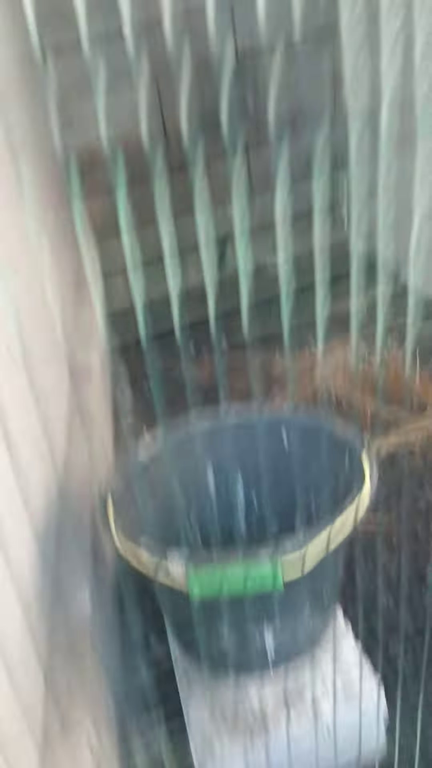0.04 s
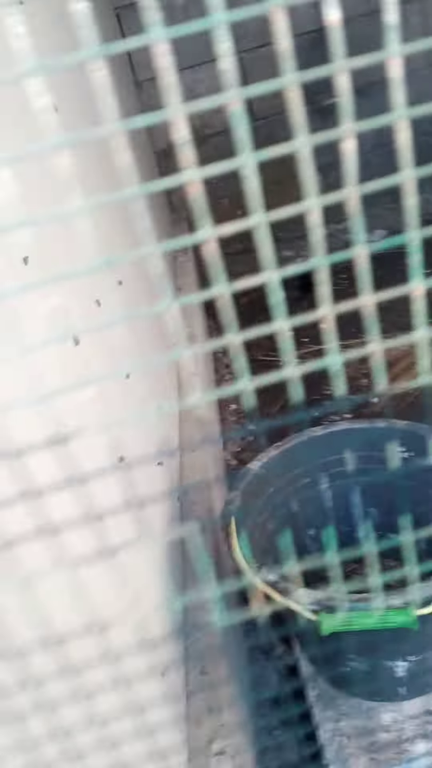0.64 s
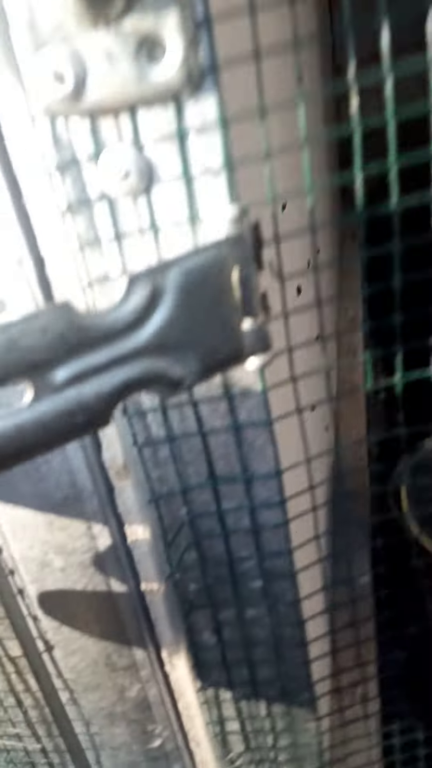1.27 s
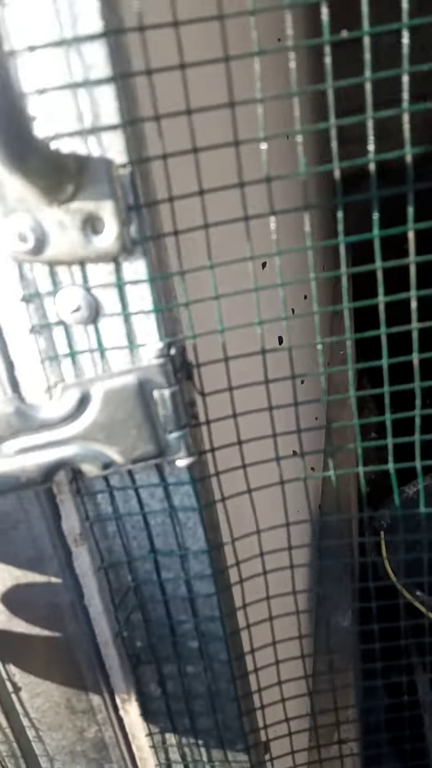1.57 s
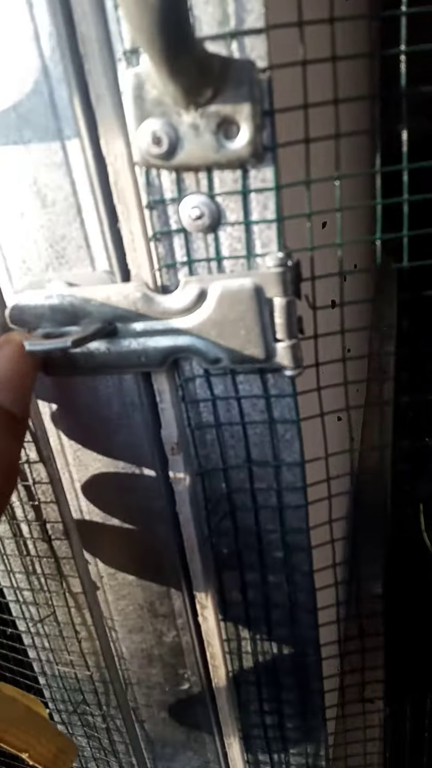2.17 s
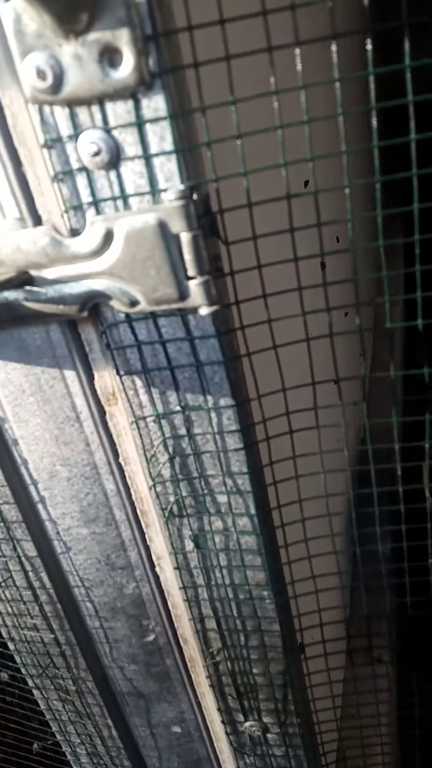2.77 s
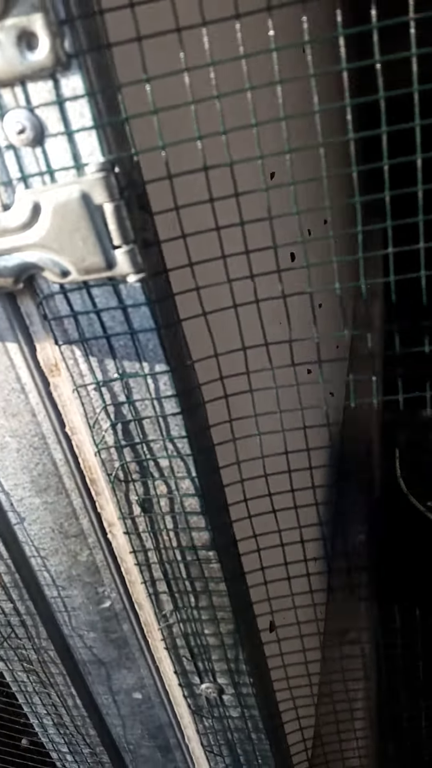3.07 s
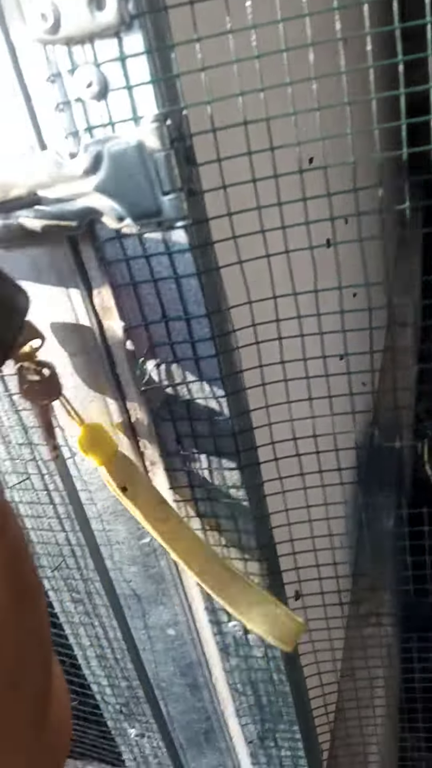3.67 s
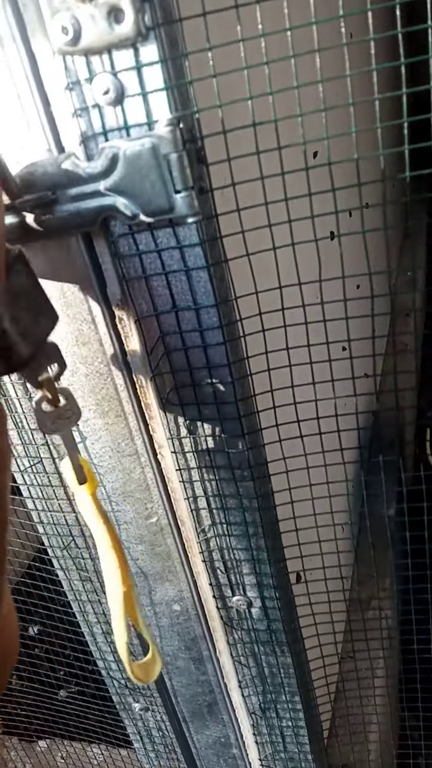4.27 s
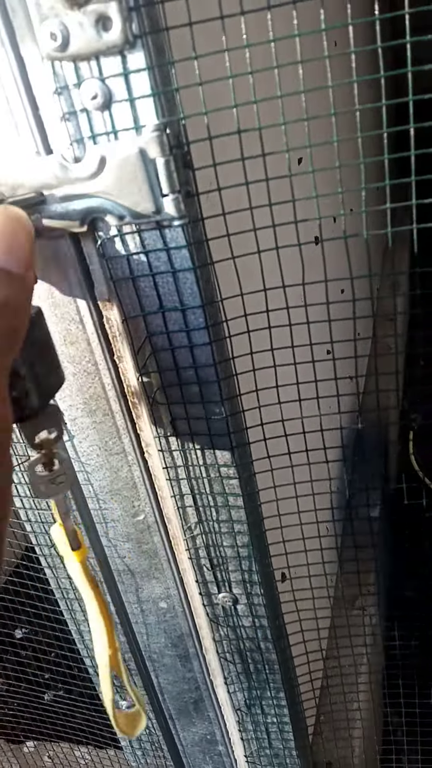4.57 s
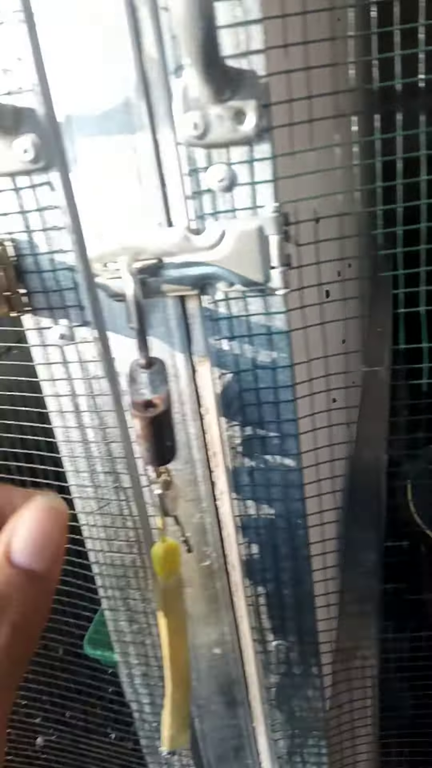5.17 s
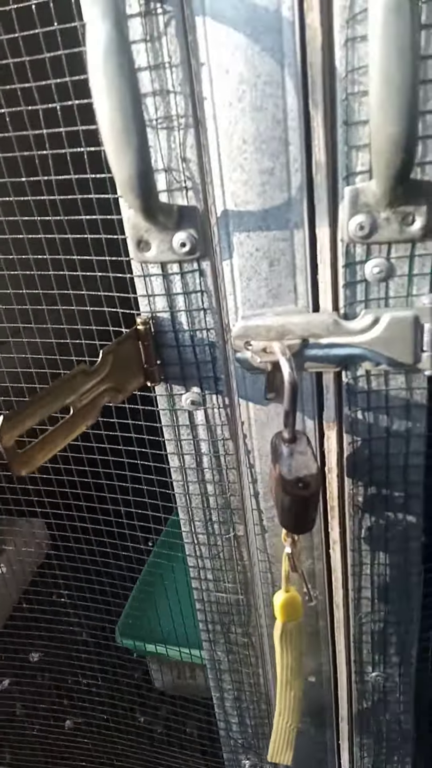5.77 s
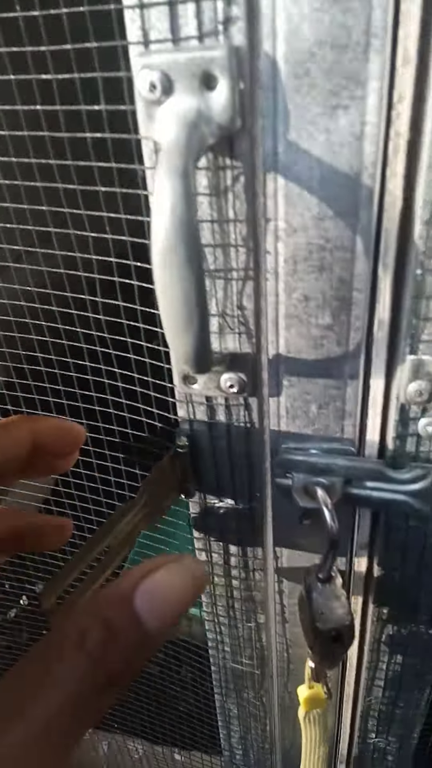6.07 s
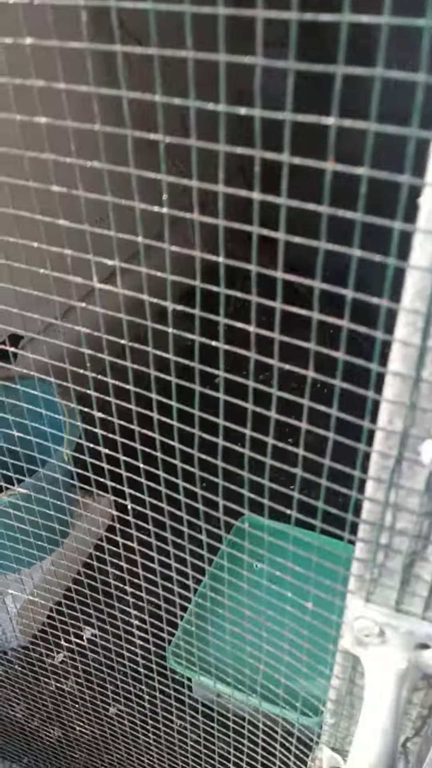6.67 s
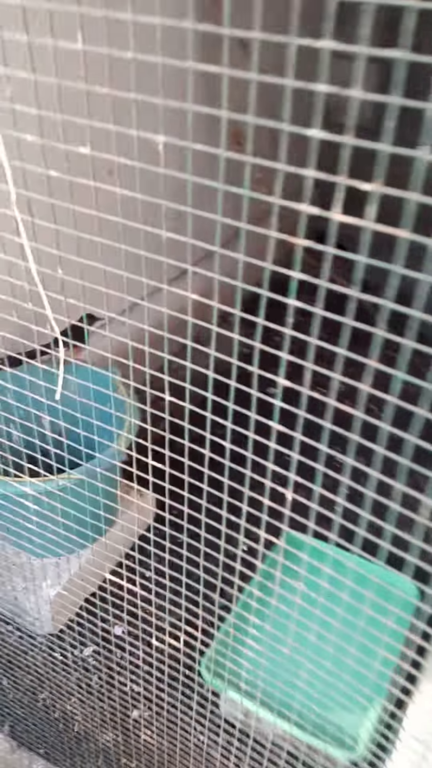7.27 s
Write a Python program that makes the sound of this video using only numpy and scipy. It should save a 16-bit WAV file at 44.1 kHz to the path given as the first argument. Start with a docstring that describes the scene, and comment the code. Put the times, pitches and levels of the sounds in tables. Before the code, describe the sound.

Close clanks from a wire-mesh metal door being latched and padlocked, with jingling keys and faint birds whistling in the background.

```python
"""Birds whistle and chirp a little way off over quiet outdoor air, echoed by the walls of a yard.
Close by, a sheet-metal door covered in wire mesh is pushed shut; its hasp rattles and a padlock is
hooked in and snapped closed, each impact exciting the damped modes of sheet, frame and hasp.
Keys tinkle under the lock in their bending modes, a second hasp ticks, and a hand brushes along
the mesh with the hiss of stick-slip friction."""
import sys
import numpy as np
from scipy import signal
from scipy.fft import rfft, irfft, next_fast_len
from scipy.io import wavfile
from scipy.ndimage import map_coordinates

SR = 44100
rng = np.random.default_rng(int(sys.argv[2]) if len(sys.argv) > 2 else 0)


def dump(signal):
    """Clip the signal to [-1, 1] and save it as 16-bit WAV at the path in sys.argv[1]."""
    limited = np.clip(np.atleast_2d(signal).T, -1, 1)
    pcm = np.round(limited * 32767).astype(np.int16)
    wavfile.write(sys.argv[1], SR, pcm)


N = 322812

# square blows on the door and its hasp: start_s, level_db, thump_db, brightness_db
DOOR_BLOWS = [(0.841, -46.5, -8.5, -7), (1.229, -48.5, -2, -12), (1.3532, -19.5, -1, -1.5),
              (1.534, -38.5, 1, -6), (1.57, -45.5, -26, -7.5), (1.969, -34.5, -7.5, -4),
              (1.986, -33, -6, 3.5), (2.029, -49, 2, 7), (3.7026, -32.5, -30, -6.5), (3.808, -35, -3.5, 8),
              (3.828, -30.5, -3, 5.5), (3.847, -36, -4.5, 5), (3.89, -38.5, -7, 2),
              (4.018, -44.5, -2.5, -5), (4.119, -38.5, -13, -8), (4.292, -51, -12, -10),
              (4.368, -34.5, -4, -1), (4.382, -42.5, -10, -9), (4.4524, -39.5, -27, -4),
              (4.501, -36.5, -29, -3), (4.5679, -19.5, -19.5, 3.5), (4.762, -31.5, -25, -4.5),
              (4.79, -51, -22, -6)]
# glancing contacts of metal on metal: start_s, level_db, thump_db, brightness_db
DOOR_SCRAPES = [(0.742, -38.5, -13, 1.5), (0.853, -47.5, -22, -1), (1.302, -35, -10, -1.5),
                (1.69, -36.5, -20, -9), (1.701, -45.5, -7, 10), (1.846, -46.5, 2.5, -5),
                (2.09, -46.5, -5.5, 5), (2.219, -48, -7.5, -4), (3.203, -29.5, -30, 6),
                (3.36, -42.5, -27, 7), (3.442, -50, -27, -10), (3.678, -40.5, -12, -8),
                (4.008, -44, -6, -2), (4.052, -49, -3, -6), (4.277, -35, -14, -13.5),
                (4.473, -38.5, -28, -12), (4.54, -36, -5.5, -3)]
# strength of the hand's brushing on the mesh: time_s, level_db
BRUSH_LEVEL = [(6.55, -64.5), (6.716, -52.5), (6.778, -63), (6.802, -50), (6.878, -57.5), (6.928, -47.5),
               (7.096, -61.5), (7.126, -43.5), (7.3, -57), (7.32, -68)]
# spectrum of the rattling door and mesh: frequency_hz, level_db
RATTLE_SPECTRUM = [(20, -77), (70, -48), (140, 3.5), (220, 2.5), (400, 0.5), (800, -0.5), (1400, 2.5),
                   (2400, -3.5), (3600, -9), (5000, -14.5), (15000, -22)]


def amp(db):
    """Decibels as an amplitude ratio."""
    return 10 ** (np.asarray(db) / 20)


def unit(x):
    """Normalisation to rms 1."""
    return x / np.sqrt(np.mean(x ** 2) + 1e-20)


def seconds(length):
    """A time axis in seconds."""
    return np.arange(int(length * SR)) / SR


def fade(t, t60):
    """Exponential decay, by 60 dB in t60 seconds."""
    return np.exp(-np.log(1000) * t / t60)


def along(points, hz):
    """Interpolation of (frequency_hz, value) points on a logarithmic frequency axis."""
    knots_hz, values = np.transpose(points)
    return np.interp(np.log(hz + 1), np.log(knots_hz + 1), values)


def curve(points):
    """Linear interpolation of (time_s, value) points at every sample."""
    return np.interp(np.arange(N) / SR, *np.transpose(points))


def add(track, start_s, sound):
    """Superposition of a sound on the track."""
    start = int(np.clip(round(start_s * SR), 0, N))
    track[start:start + len(sound)] += sound[:N - start]


def wobble(rate):
    """Smooth random modulation, with rate knots a second."""
    return map_coordinates(rng.standard_normal(int(N * rate / SR) + 4), [np.arange(N) * rate / SR])


def coloured(x, spectrum):
    """Zero-phase filtering by a (frequency_hz, level_db) curve, normalised to rms 1."""
    size = next_fast_len(len(x))
    gain = amp(along(spectrum, np.fft.rfftfreq(size, 1 / SR)))
    return unit(irfft(rfft(x, size) * gain, size)[:len(x)])


def resonant(x, spectrum):
    """Minimum-phase filtering: folding the cepstrum makes the response follow its cause."""
    size = 2 * len(x)
    cepstrum = irfft(np.log(amp(along(spectrum, np.fft.rfftfreq(size, 1 / SR)))))
    cepstrum[1:len(x)] *= 2
    cepstrum[len(x) + 1:] = 0
    return irfft(rfft(x, size) * np.exp(rfft(cepstrum)))[:len(x)]


def damped(noise, decay, stretch=1):
    """Frequency-dependent damping: each band decays with its own t60, times stretch."""
    hz, t, bands = signal.stft(noise, SR, nperseg=256)
    t60 = stretch * along(decay, hz)[:, None]
    return signal.istft(bands * amp(-60 * t / t60), SR, nperseg=256)[1][:len(noise)]


def air(level_db=-66):
    """Stationary coloured noise forms the outdoor background."""
    # ambient spectrum: frequency_hz, level_db
    spectrum = [(20, -9), (45, -22), (65, -0.5), (92, 7), (125, 2), (200, -4), (400, -13), (900, -17.5),
                (2000, -10.5), (4400, -24), (5500, -33), (6700, -9), (8000, -36), (9400, -16), (10800, -46),
                (16000, -43)]
    return amp(level_db) * coloured(rng.standard_normal(N), spectrum)


def yard(x):
    """Reverberation: diffuse reflections from the walls act as convolution with decaying noise."""
    # reverberation time of the yard: frequency_hz, t60_s
    decay = [(300, 1), (2000, 0.23), (5000, 0.68), (12000, 0.11)]
    tail = damped(rng.standard_normal(SR // 2), decay)
    return signal.fftconvolve(x, tail / np.linalg.norm(tail))[:N]


def bird_tone(hz, overtone_db=-31, taper=0.4):
    """A nearly pure tone with a weak second harmonic; its phase is the integral of frequency."""
    phase = 2 * np.pi * np.cumsum(hz) / SR
    return signal.windows.tukey(len(hz), taper) * (np.sin(phase) + amp(overtone_db) * np.sin(2 * phase))


def far_whistles(bend=1.6, flutter_db=3, waver=0.0313, wall_delay_s=0.048, wall_db=-7):
    """Frequency glides that level off; reflection from a wall repeats each a moment later."""
    # slurred whistles and low, distant calls: start_s, length_s, start_hz, end_hz, level_db
    calls = [(0, 0.096, 2490, 2226, -65), (0.108, 0.1, 1610, 1864, -64.5), (0.154, 0.15, 2185, 2430, -65),
             (0.379, 0.043, 2415, 2545, -58.5), (0.384, 0.071, 2066, 1964, -62.5),
             (0.478, 0.17, 1500, 2427, -62), (0.768, 0.12, 1210, 1800, -56),
             (0.866, 0.22, 1460, 2557, -63.5), (1.638, 0.064, 619, 648, -57.5),
             (1.74, 0.15, 1605, 1570, -54), (2.413, 0.12, 1260, 1582, -53.5),
             (2.616, 0.1015, 1740, 1956, -50.5), (2.69, 0.11, 1960, 1708, -53),
             (2.721, 0.545, 763, 770, -69), (3.004, 0.13, 1190, 1890, -53.5), (3.077, .21, 1930, 2533, -54),
             (3.415, 0.11, 1390, 2360, -54), (3.697, 0.13, 1300, 2140, -56), (6.377, 0.19, 1522, 1860, -55),
             (6.716, 0.087, 1398, 1235, -52.5), (6.895, 0.09, 2070, 1830, -49.5)]
    out, drift = np.zeros(N), 1 + waver * wobble(170)
    for start_s, length_s, start_hz, end_hz, db in calls:
        progress = seconds(length_s) / length_s
        hz = end_hz + (start_hz - end_hz) * (1 - progress) ** bend
        hz *= drift[int(start_s * SR):][:len(hz)]
        add(out, start_s, amp(db) * bird_tone(hz))
    out *= amp(flutter_db * wobble(60))
    return out + amp(wall_db) * np.pad(out, (int(wall_delay_s * SR), 0))[:N]


def chirps(rasp=0.04, warble=0.0506, flutter_db=3):
    """Rapid frequency modulation spreads each arched chirp into raspy sidebands."""
    # bird chirps: start_s, length_s, reference_hz, level_db
    calls = [(0.136, 0.09, 4420, -64), (0.256, 0.085, 3280, -68), (5.646, 0.025, 3410, -59),
             (5.753, 0.16, 3904, -44.5), (6.015, 0.05, 3410, -50.5), (6.128, 0.17, 3890, -47)]
    # pitch contour of every chirp: share_of_length, share_of_reference_pitch
    arch = [(0, 0.9), (0.18, 0.86), (0.33, 0.95), (0.7, 0.94), (1, 0.7)]
    out, shake = np.zeros(N), 1 + rasp * wobble(450) + warble * wobble(110)
    for start_s, length_s, reference_hz, db in calls:
        progress = seconds(length_s) / length_s
        hz = reference_hz * np.interp(progress, *np.transpose(arch))
        hz *= shake[int(start_s * SR):][:len(hz)]
        add(out, start_s, amp(db) * bird_tone(hz))
    return out * amp(flutter_db * wobble(80))


def held_whistle(start_s=1.602, length_s=0.34, pitch_hz=1895, sink_hz_per_s=270,
                 level_db=-49.5, swell_db=9, waver=0.013, flutter_db=2):
    """Slow amplitude and frequency modulation: a nearer bird's long note swells and sinks."""
    out, t = np.zeros(N), seconds(length_s)
    hz = (pitch_hz - sink_hz_per_s * t) * (1 + waver * wobble(150)[:len(t)])
    db = level_db + swell_db * np.sin(np.pi * t / length_s) ** 2 + flutter_db * wobble(69.2)[:len(t)]
    add(out, start_s, amp(db) * bird_tone(hz, overtone_db=-23, taper=0.1))
    return out


def friction(spectrum, slips_per_s, spread_db, hiss):
    """Stick-slip friction: random impulses of uneven size over a smooth hiss."""
    slips = (rng.random(N) < slips_per_s / SR) * rng.standard_normal(N)
    slips *= amp(spread_db * np.clip(rng.standard_normal(N), -2, 2))
    return coloured(unit(slips) + hiss * rng.standard_normal(N), spectrum)


def mesh_shiver(strain_db=1, shudder_db=-43.5, db_per_contact_db=0.22, rise_s=0.023, t60_s=0.52):
    """Incoherent vibrations add in power: a tremble under the hand and a shudder after each contact."""
    # trembling of the mesh while the door is held: time_s, level_db
    strain = [(0.0, -78), (1.28, -66), (1.41, -68.5), (1.94, -54.5), (2.44, -70), (3.75, -62.5),
              (3.85, -51), (4.32, -68), (4.49, -52), (4.65, -58.5), (4.87, -67.5), (5.28, -73), (6.01, -67),
              (6.63, -70.5), (6.85, -64.5), (7.32, -69)]
    power, t = amp(curve(strain) + strain_db) ** 2, seconds(1)
    shudder = (1 - np.exp(-t / rise_s)) * fade(t, t60_s)
    for start_s, db, *_ in list(DOOR_BLOWS) + list(DOOR_SCRAPES):
        add(power, start_s, (amp(shudder_db + db_per_contact_db * db) * shudder) ** 2)
    envelope = np.sqrt(power) * amp(2 * wobble(30))
    return envelope * friction(RATTLE_SPECTRUM, slips_per_s=900, spread_db=3, hiss=0.99)


def skin_rub(grip_db=-76, taper=0.86, stick_db=3):
    """Sliding friction of skin on metal swells with each stroke above a faint resting grip."""
    # strokes of the hand: start_s, length_s, level_db
    strokes = [(2.058, 0.69, -61), (2.565, 0.59, -60), (3.6, 0.42, -54), (4.4, 0.56, -87),
               (5.045, 0.35, -66.5), (5.52, 0.62, -62.5), (5.988, 0.63, -64)]
    # spectrum of skin on metal: frequency_hz, level_db
    spectrum = [(30, -39), (300, -2), (1500, 6), (3500, 6.5), (5200, -2), (7600, 8.5), (10000, -3.5),
                (12500, -3.5), (15200, -0.5)]
    envelope = np.full(N, amp(grip_db))
    for start_s, length_s, db in strokes:
        add(envelope, start_s, amp(db) * signal.windows.tukey(int(length_s * SR), taper))
    envelope *= amp(stick_db * wobble(16))
    return envelope * friction(spectrum, slips_per_s=1500, spread_db=-1, hiss=1.4)


def mesh_brush(gain_db=1, flutter_db=2, edge_s=0.01):
    """Friction of a passing hand excites the resonances of the wires."""
    # spectrum of the brushed wires: frequency_hz, level_db
    spectrum = [(180, -16), (300, -12), (565, -13), (978, -4), (1660, -1.5), (1930, -1), (2210, -5),
                (3460, -4), (5430, -10.5), (7950, -2.5), (10700, -22.5), (14500, -14), (16000, -16)]
    t = np.arange(N) / SR
    gate = np.clip(np.minimum(t - BRUSH_LEVEL[0][0], BRUSH_LEVEL[-1][0] - t) / edge_s, 0, 1)
    envelope = gate * amp(curve(BRUSH_LEVEL) + gain_db + flutter_db * wobble(60))
    return envelope * friction(spectrum, slips_per_s=500, spread_db=7, hiss=1)


def wire_snaps(snaps_per_s=20, boost_db=12, treble_db=8):
    """Plucking: rows for ticks() of wires that flick free at random, louder under harder brushing."""
    brush_s, brush_db = np.transpose(BRUSH_LEVEL)
    count = int(snaps_per_s * (brush_s[-1] - brush_s[0]))
    starts = rng.uniform(brush_s[0], brush_s[-1], count)
    return [(start_s, np.interp(start_s, brush_s, brush_db) + boost_db, treble_db) for start_s in starts]


def ticks(gain_db=-6, t60_s=0.014, tail_db=-24, tail_t60_s=0.46):
    """Brief impacts of small parts give broadband clicks with hardly any ring."""
    # dry ticks of metal parts and wires: start_s, level_db, treble_db
    contacts = [(3.0035, -40, -8), (3.0061, -33.5, -14), (3.0778, -22.5, 9), (3.0838, -31, -7),
                (3.156, -41, -5), (3.264, -30, 14), (4.0191, -33.5, -13), (4.2942, -28.5, 35),
                (4.3794, -26.5, 0.0), (4.4521, -28, -14), (4.9614, -38, -7), (5.2979, -46.5, -41),
                (5.7518, -30.5, -11), (5.9375, -34, -21), (6.0861, -35, -17), (6.2984, -35, -5),
                (6.32, -35, -8), (6.4153, -33, 1), (6.4229, -31, 1), (6.4333, -37, -8), (6.5247, -42, -6),
                (6.7075, -34.5, -16), (6.959, -29.5, -8), (6.992, -30, -9), (7.1273, -28.5, 19),
                (7.1667, -29, 12)]
    # spectrum of a tick: frequency_hz, level_db
    spectrum = [(100, -58), (500, -6), (1300, -8), (3500, 8.5), (5000, 0), (7600, 14), (9800, -3),
                (15000, -3)]
    out, t = np.zeros(N), seconds(0.16)
    envelope = fade(t, t60_s) + amp(tail_db) * fade(t, tail_t60_s)
    for start_s, db, treble_db in list(contacts) + wire_snaps():
        tilt = [(2000, -treble_db), (9000, 0)]
        colour = [(hz, band_db + along(tilt, hz)) for hz, band_db in spectrum]
        click = resonant(rng.standard_normal(len(t)) * envelope, colour)
        add(out, start_s, amp(db + gain_db) * click / np.std(click[:SR // 1000]))
    return out


def finger_taps(width_s=0.0011, ring_db=-24, ring_t60_s=0.31):
    """Heavy damping limits a knock to a few cycles; the door rings faintly in answer."""
    # dull taps on the loose hasp: start_s, level_db, pitch_hz
    taps = [(5.7490, -27, 1510), (6.088, -29, 1360), (6.796, -37, 1700)]
    out, t = np.zeros(N), seconds(0.2)
    for start_s, db, hz in taps:
        knock = np.exp(-(t / width_s - 1) ** 2) * np.sin(2 * np.pi * hz * t)
        rattle = coloured(rng.standard_normal(len(t)), RATTLE_SPECTRUM)
        add(out, start_s, amp(db) * (knock + amp(ring_db) * fade(t, ring_t60_s) * rattle))
    return out


def key_slide(start_s=2.955, length_s=0.033, from_hz=7600, to_hz=8300, scatter=0.055, level_db=-40):
    """Random frequency modulation roughens the rising zing of a key scraping round its ring."""
    out, progress = np.zeros(N), seconds(length_s) / length_s
    hz = (from_hz + (to_hz - from_hz) * progress) * (1 + scatter * wobble(1490)[:len(progress)])
    zing = np.sin(2 * np.pi * np.cumsum(hz) / SR)
    add(out, start_s, amp(level_db) * signal.windows.tukey(len(zing)) * zing)
    return out


def keys(low_hz=7600, high_hz=11480, twin_hz=7660, twin_db=-12, linger_db=-27, rise_s=0.000057):
    """A key rings in two bending modes, the lower a beating pair; a fast decay leaves a faint tail."""
    # a key swinging against the lock: start_s, level_db, upper_mode_db, t60_s
    clinks = [(2.819, -33, -29, 0.023), (2.841, -43.5, -23, 0.073), (2.914, -29, -8.5, 0.1),
              (2.949, -31.5, -13, 0.044), (3.005, -32, -11, 0.036), (3.041, -36.5, -26, 0.15),
              (3.078, -29.5, -2, 0.083), (3.168, -52, -29, 0.33), (3.263, -47, -8, 0.17),
              (3.319, -41.5, -10, 0.015), (4.087, -35.5, -30, 0.19), (4.305, -48, -20, 0.5),
              (4.819, -32.5, -18, .12), (4.962, -40.5, -21, 0.16)]
    out, t = np.zeros(N), seconds(0.6)
    for start_s, db, upper_db, t60 in clinks:
        modes = np.sin(2 * np.pi * low_hz * t) + amp(upper_db) * np.sin(2 * np.pi * high_hz * t)
        twin = amp(twin_db) * fade(t, t60) * np.sin(2 * np.pi * (twin_hz * t + rng.random()))
        envelope = fade(t, t60) + amp(linger_db) * fade(t, t60=0.6)
        add(out, start_s, amp(db) * (modes * envelope + twin) * (1 - np.exp(-t / rise_s)))
    return out


def ring(modes, t, spread_db=4.76, detune=0.0037):
    """Modal superposition: damped sines whose strength and pitch vary as the parts shift."""
    out = np.zeros(len(t))
    for hz, db, t60 in modes:
        envelope = amp(db + rng.normal(0, spread_db)) * fade(t, t60)
        shifted_hz = hz * (1 + detune * rng.normal())
        out += envelope * np.sin(2 * np.pi * (shifted_hz * t + rng.random()))
    return out


def strike(db, thump_db, bright_db, rise_s, ring_scale=0.83, gain_db=-3):
    """Impact excitation: one contact rings the hasp, the frame and the dense modes of the sheet."""
    # crowded modes of the sheet and mesh: frequency_hz, level_db
    sheet_spectrum = [(40, -50), (150, -62), (230, -9), (370, -11.5), (750, 1), (960, -5), (1450, 4.5),
                      (2100, -5.5), (3500, -2.5), (4900, -9.5), (7600, -4), (9800, -15.5), (12500, -17),
                      (15200, -18.5)]
    # their decay, before ring_scale: frequency_hz, t60_s
    sheet_decay = [(200, 0.36), (600, 0.36), (1400, 0.34), (3000, 0.25), (6000, 0.17), (14000, 0.14)]
    # modes of the door's frame and panel: pitch_hz, level_db, t60_s
    frame_modes = [(221.9, -15, 0.63), (254, -14.5, 0.27), (281.4, -12, 0.36), (467.6, -11, 0.25),
                   (803, -23, 0.2), (1030, -11, 0.21), (1537, -10, 0.16), (2800, -5, 0.16), (3450, -5, 0.1)]
    # modes of the steel hasp and padlock, before ring_scale: pitch_hz, level_db, t60_s
    hasp_modes = [(1260, -8.5, 0.26), (1340, -11.5, 0.16), (1380, -11, 0.27), (1472, -7.5, 0.23),
                  (1602, -16, 0.24), (1962, -11.5, 0.16), (2360, -18, 0.16), (2474, 1.5, 0.031),
                  (2477, -5, 0.09), (2563, -8.5, 0.21), (3070, -13, 0.1), (3250, -16, 0.1),
                  (3570, -8.5, 0.17), (3730, -11.5, 0.088), (3800, -18, 0.068), (3950, -7, 0.048),
                  (7270, -10, 0.054), (7780, -11, 0.08), (15120, -18, 0.13)]
    t = seconds(0.44)
    # a dull or soft contact favours the clunk of the middle modes, a hard one the upper modes
    clunk_db = -0.7 - 0.58 * bright_db - 0.14 * (db + 35.5)
    contact = [(500, 0), (900, 0), (1200, clunk_db / 2), (1700, clunk_db / 2),
               (2300, -clunk_db / 2), (4000, -clunk_db / 2), (6000, bright_db)]
    boom = [(500, 4 + 0.67 * thump_db), (900, 0)]  # the sheet's low modes follow the frame's thump
    colour = [(hz, band_db + along(contact, hz) + along(boom, hz)) for hz, band_db in sheet_spectrum]
    sheet = amp(0.5) * damped(coloured(rng.standard_normal(len(t)), colour), sheet_decay, ring_scale)
    # the parts chatter against each other for the first few milliseconds
    chatter = amp(7) * fade(t, 0.029 * ring_scale) * coloured(rng.standard_normal(len(t)), colour)
    frame = amp(1 + thump_db) * ring(frame_modes, t)
    excited = [(hz, mode_db + along(contact, hz), t60 * ring_scale) for hz, mode_db, t60 in hasp_modes]
    hasp = amp(1) * ring(excited, t)
    blow = (sheet + chatter + frame + hasp) * (1 - np.exp(-t / rise_s))
    return amp(db + gain_db) * blow / np.std(blow[:SR // 40])


def door(blow_rise_s=0.00027, scrape_rise_s=0.004, cutoff_hz=120):
    """Blows start at once and scrapes build up; the door's sound carries little deep bass."""
    out = np.zeros(N)
    for contacts, rise_s in (DOOR_BLOWS, blow_rise_s), (DOOR_SCRAPES, scrape_rise_s):
        for start_s, db, thump_db, bright_db in contacts:
            add(out, start_s, strike(db, thump_db, bright_db, rise_s))
    return signal.sosfilt(signal.butter(3, cutoff_hz, "high", fs=SR, output="sos"), out)


def scene():
    """The direct-to-reverberant ratio conveys distance: the metal is almost dry, the birds echo."""
    calls, chirping, note = far_whistles(), chirps(), held_whistle()
    metal = door() + keys() + key_slide() + ticks() + finger_taps()
    handling = mesh_shiver() + skin_rub() + mesh_brush()
    direct = metal + handling + note + amp(-8) * calls + amp(-2) * chirping
    far_echo = yard(calls + amp(-3) * chirping)
    near_echo = yard(amp(-27) * metal + amp(-2) * note)
    return (direct + far_echo + near_echo + air())[None]


def record(dry, top_hz=16000):
    """Band limiting: an ideal low-pass filter removes the highest treble."""
    size = next_fast_len(N + SR // 2)
    passband = np.fft.rfftfreq(size, 1 / SR) < top_hz
    return irfft(rfft(dry, size) * passband, size)[..., :N]


dry = scene()
out = record(dry)
dump(out)
```